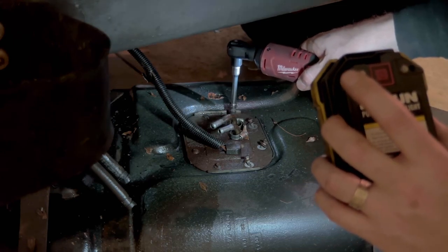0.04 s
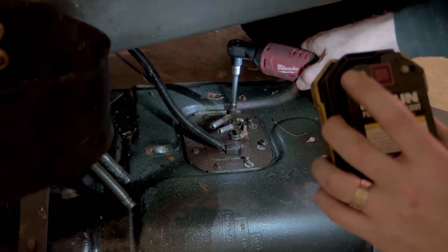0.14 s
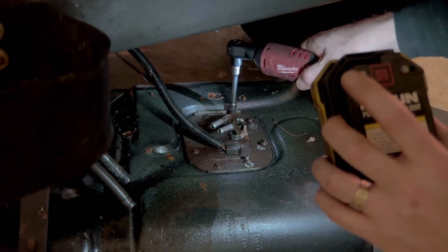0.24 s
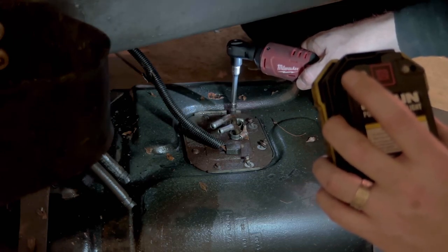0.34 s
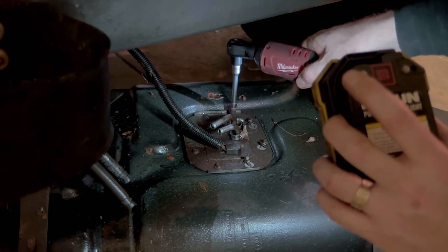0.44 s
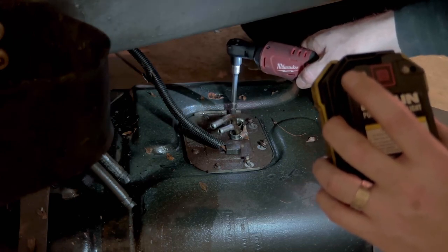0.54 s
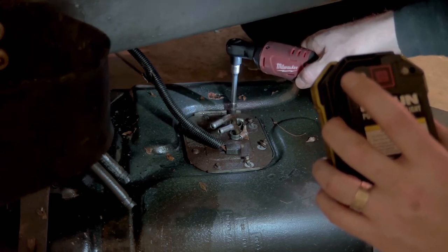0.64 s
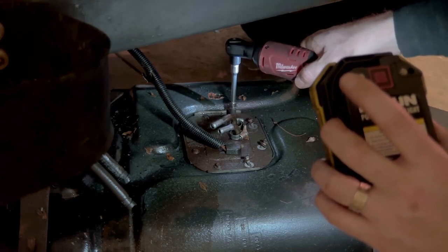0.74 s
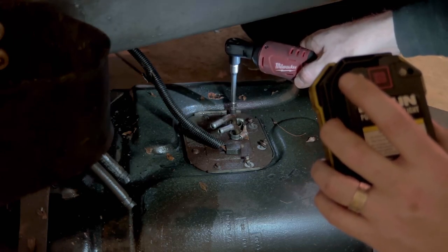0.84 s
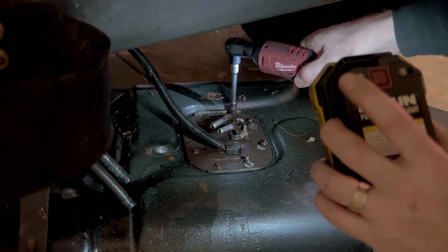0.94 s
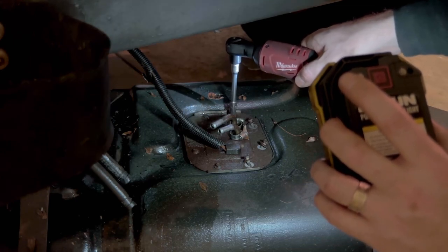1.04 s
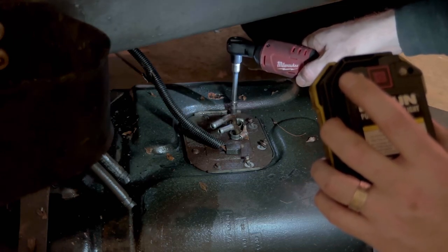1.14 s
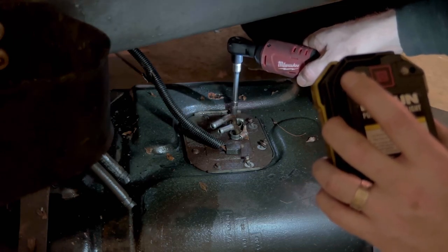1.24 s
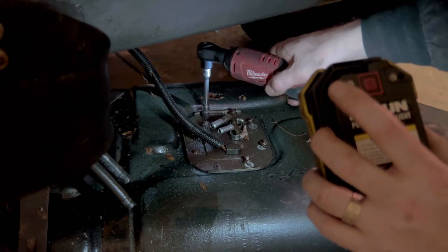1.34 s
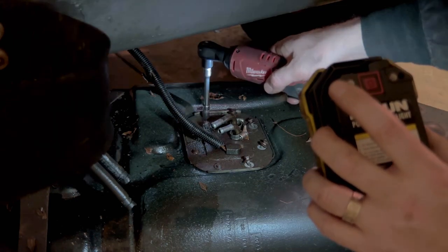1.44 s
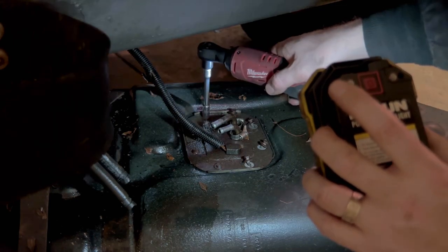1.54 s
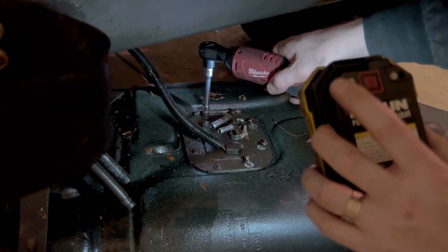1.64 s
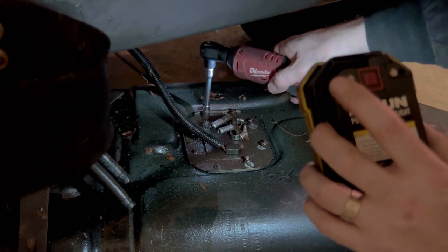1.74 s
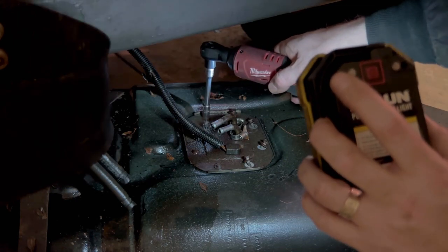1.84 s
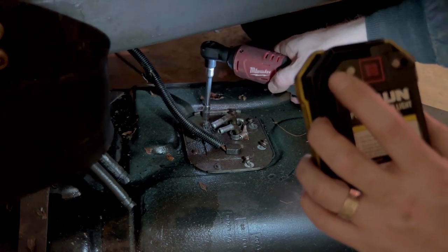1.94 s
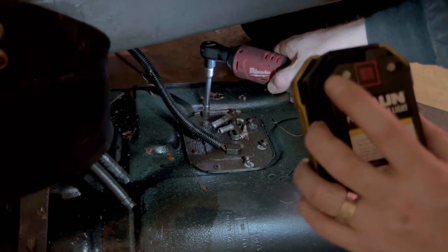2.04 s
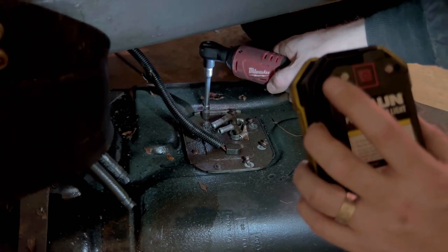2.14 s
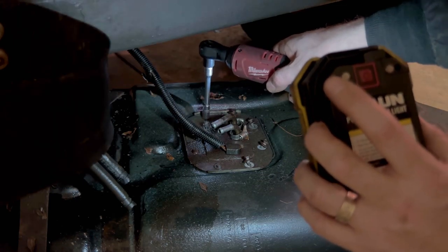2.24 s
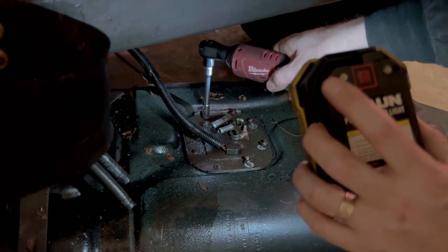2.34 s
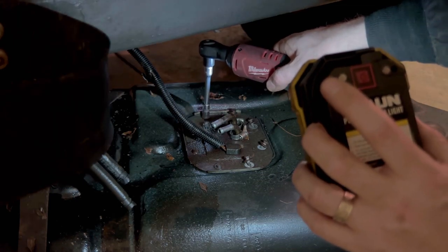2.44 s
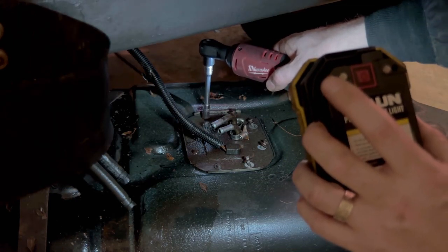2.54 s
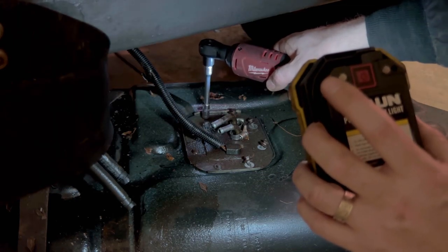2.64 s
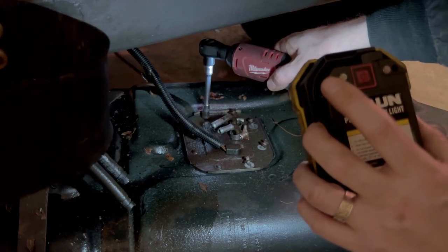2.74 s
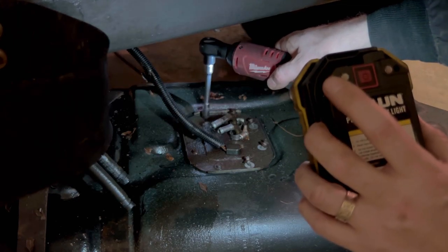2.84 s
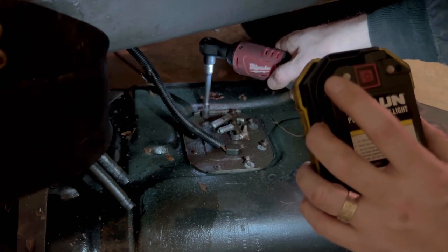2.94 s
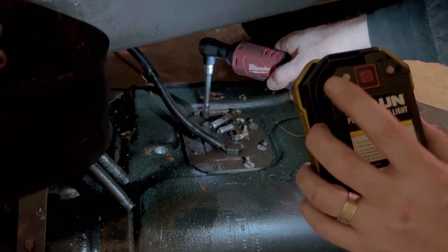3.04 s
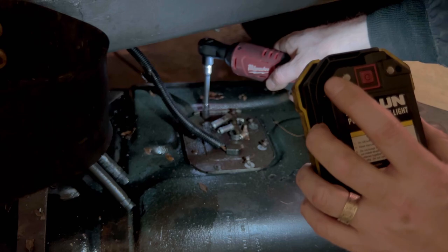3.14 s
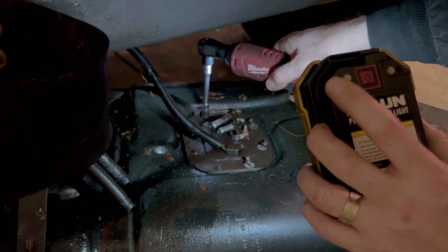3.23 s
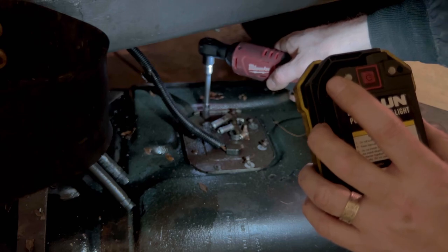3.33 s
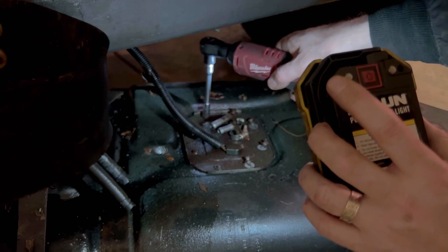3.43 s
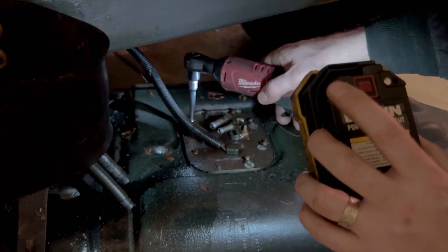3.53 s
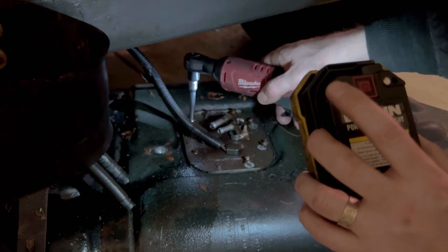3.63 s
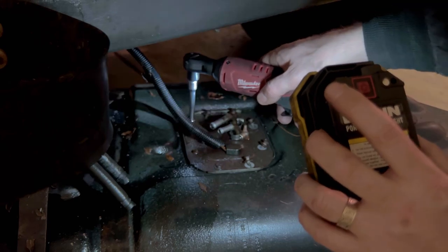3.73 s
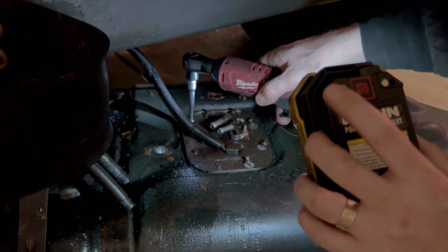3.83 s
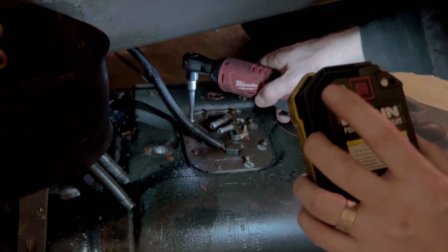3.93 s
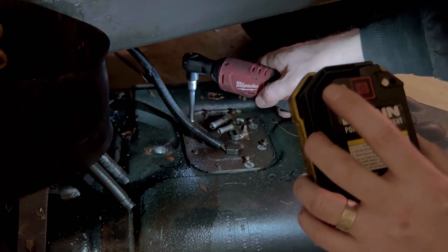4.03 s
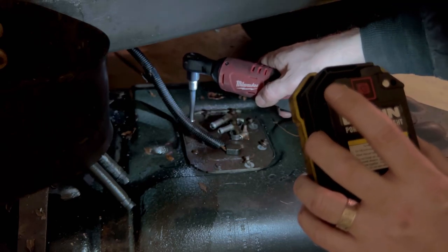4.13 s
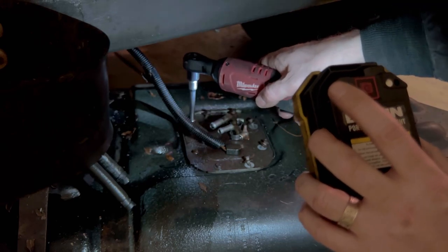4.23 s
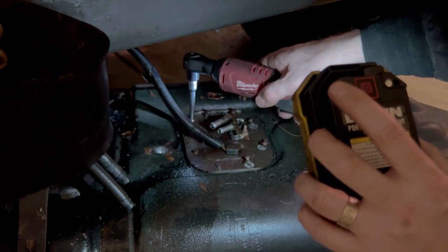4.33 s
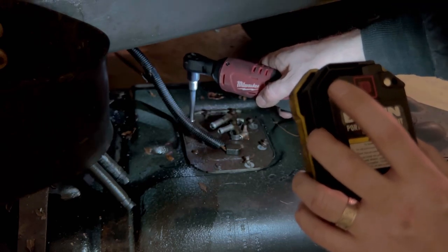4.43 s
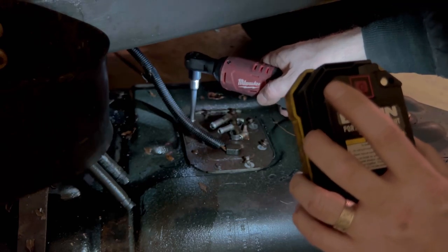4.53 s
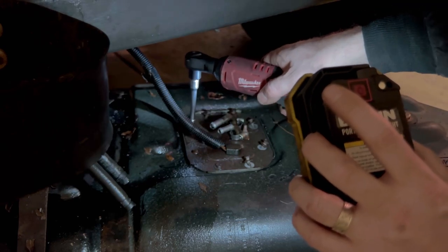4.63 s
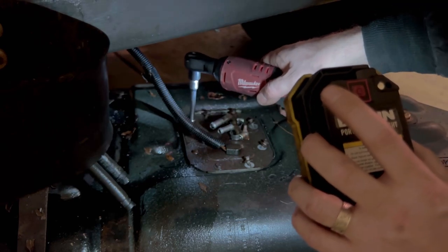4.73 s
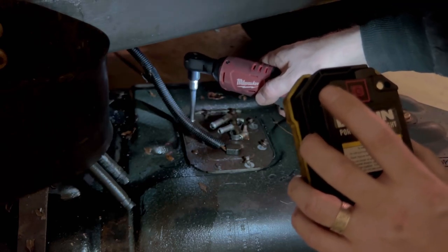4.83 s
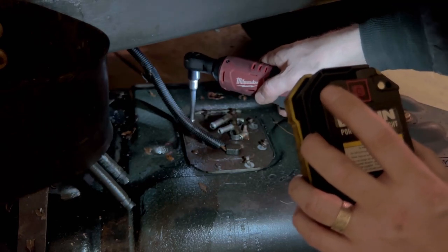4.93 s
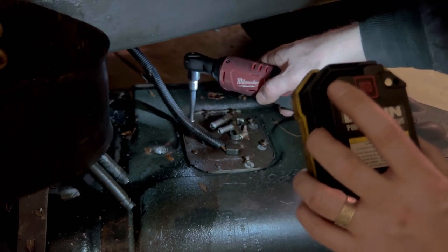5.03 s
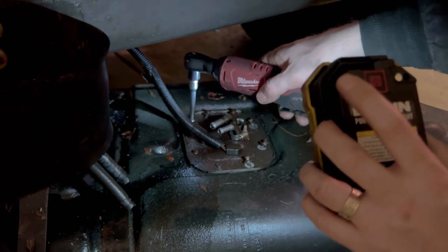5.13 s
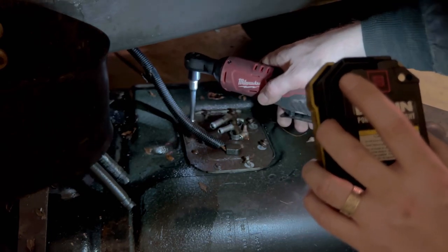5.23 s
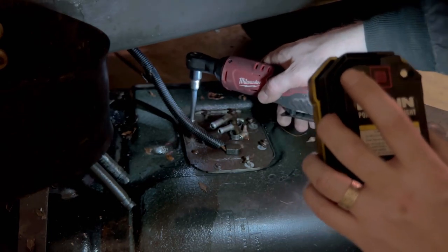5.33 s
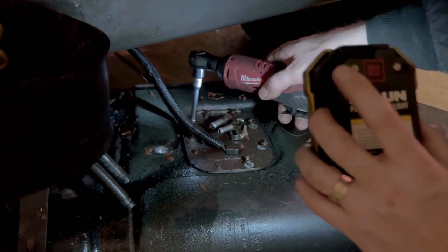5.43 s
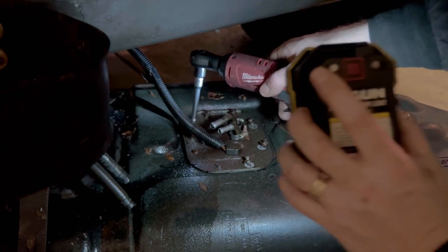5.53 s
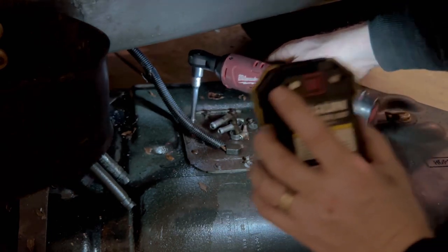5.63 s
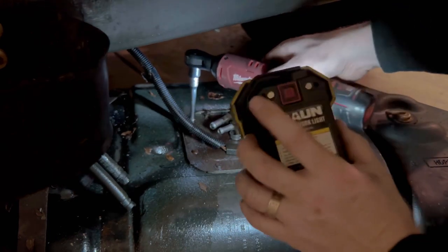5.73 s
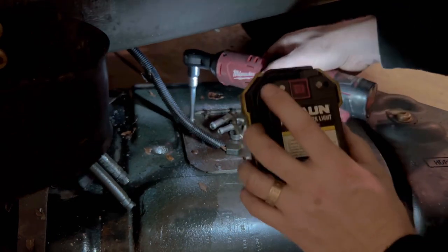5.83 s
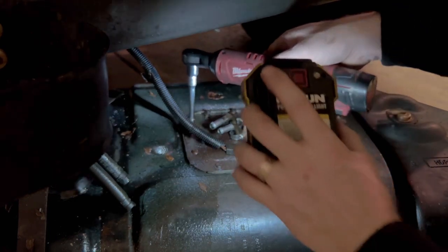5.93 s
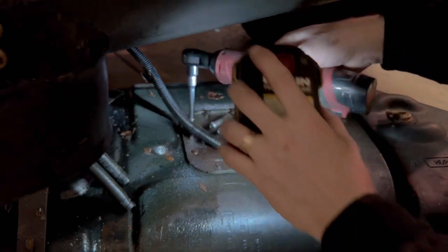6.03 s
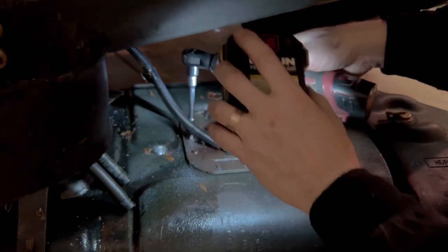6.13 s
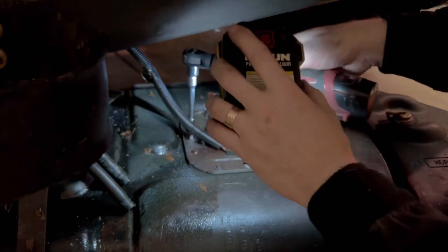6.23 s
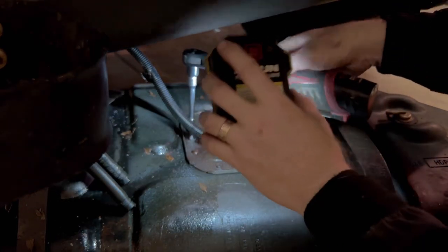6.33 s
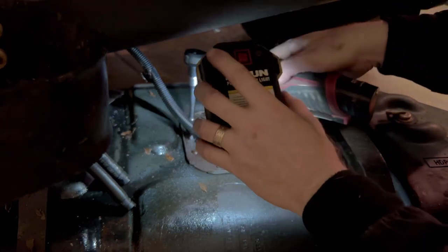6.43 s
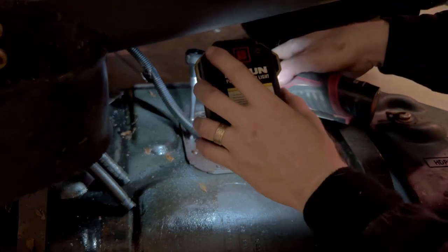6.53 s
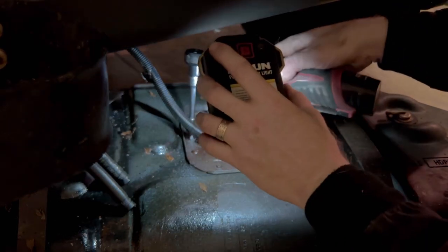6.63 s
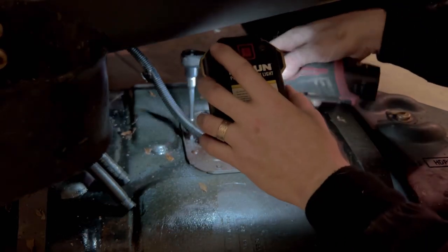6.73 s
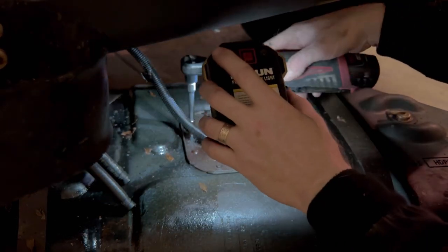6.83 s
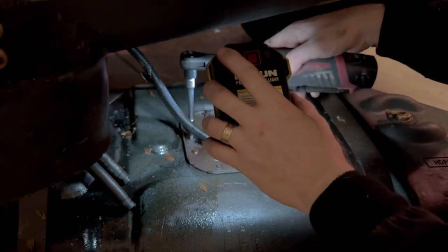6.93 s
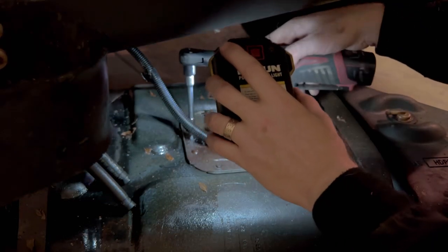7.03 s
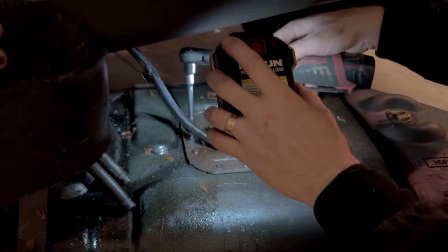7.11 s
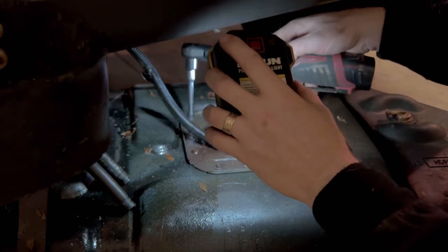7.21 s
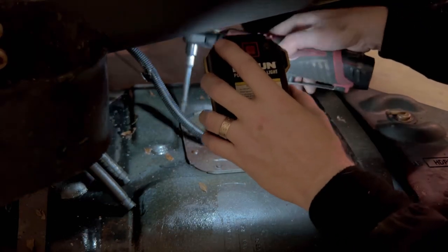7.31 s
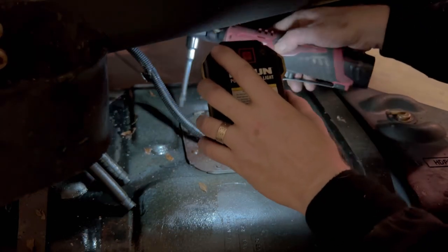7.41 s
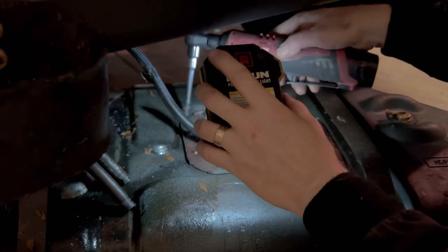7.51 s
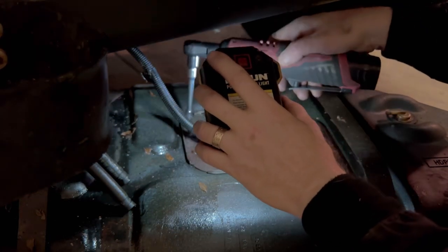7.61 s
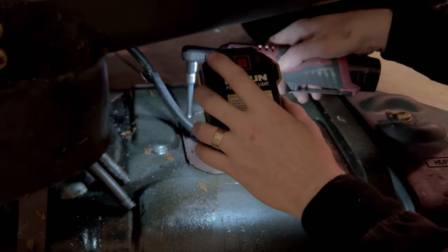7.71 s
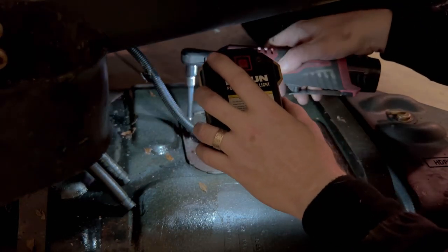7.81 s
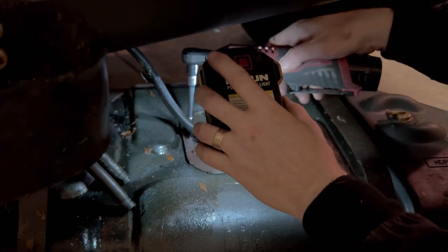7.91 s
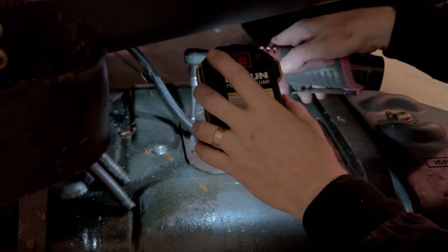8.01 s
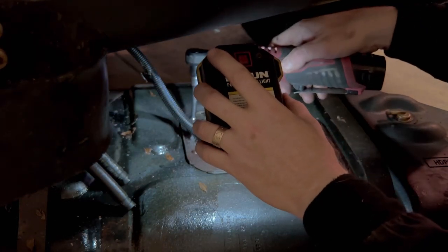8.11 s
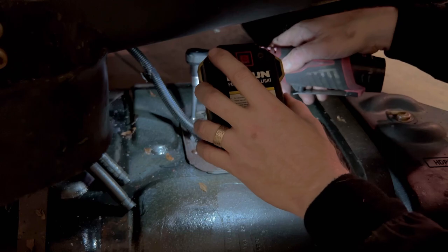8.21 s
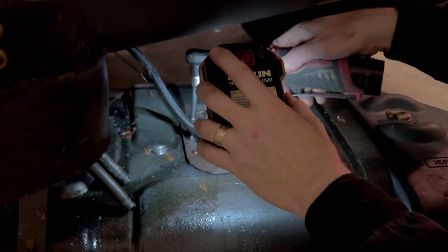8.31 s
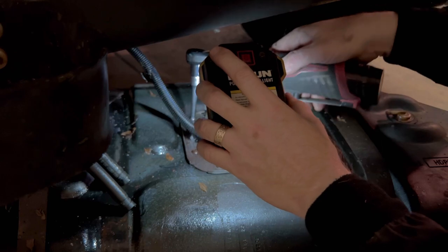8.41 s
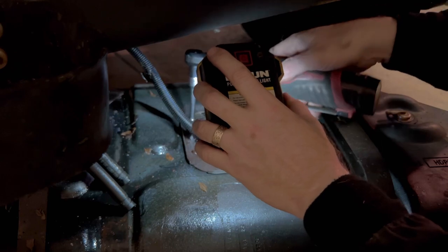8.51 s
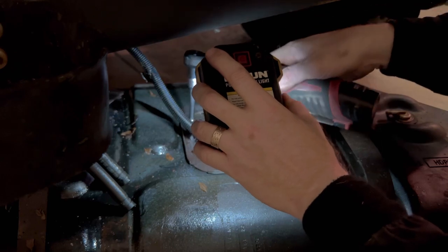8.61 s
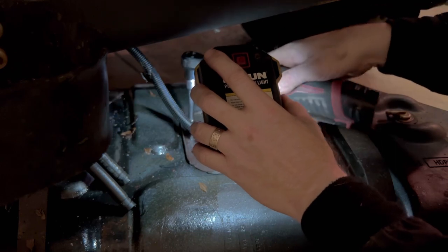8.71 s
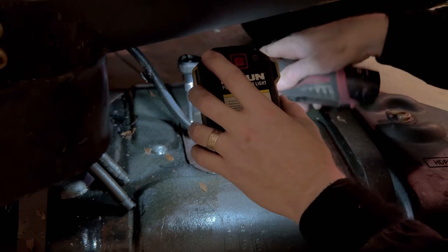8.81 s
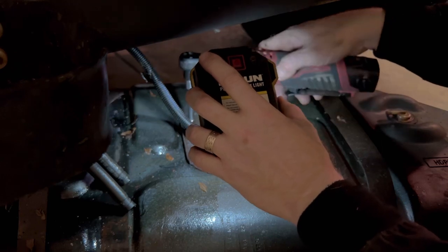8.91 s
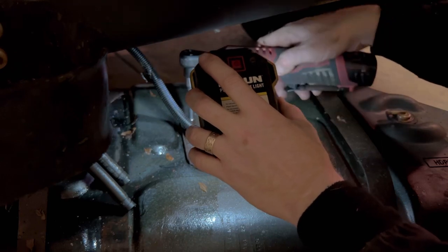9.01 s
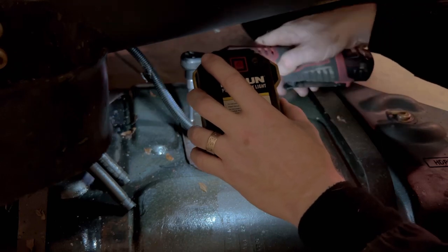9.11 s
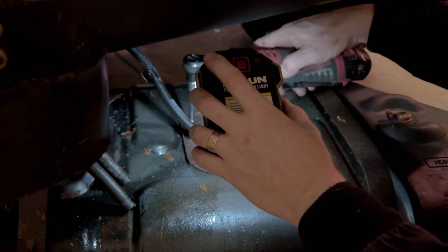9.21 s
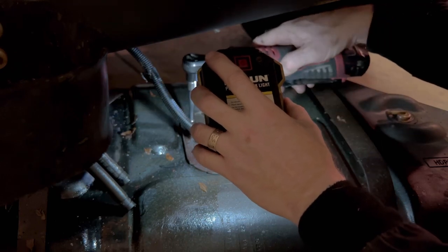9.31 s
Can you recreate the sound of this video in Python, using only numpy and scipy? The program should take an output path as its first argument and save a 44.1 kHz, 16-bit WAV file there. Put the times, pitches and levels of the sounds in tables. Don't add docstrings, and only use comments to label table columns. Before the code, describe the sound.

Close to a small camera microphone in a garage, a cordless ratchet is already running, a harsh metallic buzz with bright pawl ringing. A sharp knock leads straight into a second run pressing on the steel tank. It stops abruptly, two light ticks follow, then a last, more strained run coasts down into single clicks. Afterwards only bit and tool knocks, faint taps and low hum remain.

```python
import sys
import numpy as np
from scipy import signal
from scipy.fft import rfft, irfft, next_fast_len
from scipy.io import wavfile
from scipy.ndimage import uniform_filter1d, map_coordinates

SR = 44100
rng = np.random.default_rng(int(sys.argv[2]) if len(sys.argv) > 2 else 0)


def store_wav(level_fs):
    pcm = np.round(np.clip(np.atleast_2d(level_fs), -1, 1) * 32767)
    wavfile.write(sys.argv[1], SR, pcm.T.astype(np.int16))


def rack_gain(trim_db):
    fader = np.asarray(trim_db, float)
    return 10 ** (fader / 20)


N = 412762
FULL = 73.5


def unit(x):
    return x / np.sqrt(np.mean(x ** 2) + 1e-20)


def along(points, hz):
    f, v = np.transpose(points)
    return np.interp(np.log(hz + 1), np.log(f + 1), v)


def curves(rows, off=None):
    s, *cols = np.transpose(rows)
    t = np.arange(N) / SR
    return np.array([np.interp(t, s, c, off, off) for c in cols])


def wobble(rate):
    knots = rng.standard_normal(int(N * rate / SR) + 4)
    return map_coordinates(knots, [np.arange(N) * rate / SR])


def filtered(x, response):
    m = next_fast_len(len(x) + 8192)
    return irfft(rfft(x, m) * response(np.fft.rfftfreq(m, 1 / SR)), m)[:len(x)]


def coloured(x, spectrum):
    return unit(filtered(x, lambda hz: rack_gain(along(spectrum, hz))))


def band(x, low_hz, top_hz):
    return signal.sosfilt(signal.butter(4, [low_hz, top_hz], "band", fs=SR, output="sos"), x)


def decays(impulses, t60):
    return signal.lfilter([1], [1, -rack_gain(-60 / (t60 * SR))], impulses)


def strikes(angle, pattern, jitter_s, scatter_db):
    out = np.zeros(N)
    for place, db in pattern:
        at = np.flatnonzero(np.diff(np.floor(angle - place)) == 1)
        luck = rng.standard_normal((N // 300, 2))[:len(at)]
        at = np.clip(at + (jitter_s * SR * luck[:, 0]).astype(int), 0, N - 1)
        out[at] += rack_gain(db + scatter_db * (luck[:, 1] + 0.54 * wobble(2.3)[at]))
    return out


def orders(angle, multiples, levels_db, flicker_db, drift):
    out = np.zeros(N)
    for multiple, db in zip(multiples, levels_db):
        level = rack_gain(db + flicker_db * wobble(16))
        out += level * np.sin(2 * np.pi * multiple * angle + drift * wobble(22))
    return out


def garage(push_db):
    # time in seconds,
    # level in dB.
    background_curve = [(0, -5), (3.0, -1), (3.6, 2.5), (5.7, 1), (5.95, -0.5), (6.4, 0), (7.45, -1.5), (8.3, 4.5),
                        (9.36, 6.5)]
    # frequency in Hz, level in dB per Hz.
    hum_spectrum = [(15, -54.5), (25, -19), (50, -5.5), (65, 1.5), (140, -11), (162, -15.5), (194, -22),
                    (300, -18), (390, -46.5), (660, -120)]
    # frequency in Hz, level in dB per Hz.
    air_spectrum = [(120, -42), (200, -16.5), (320, -7.5), (700, -14.5), (1400, -20), (2500, -22.5),
                    (4300, -26), (4800, -31.5), (8400, -33.5), (9300, -39.5), (12500, -37.5), (14500, -40),
                    (15800, -57)]
    # time in seconds, rustle in dB.
    sleeve = [(5.72, -36), (5.73, -41), (5.822, -61.5), (5.93, -52), (6.056, -60), (6.338, -63.5),
              (6.5, -78)]
    # frequency in Hz, level in dB per Hz.
    cloth_spectrum = [(710, -41), (1200, -7), (2000, -2), (5180, -6.5), (6230, -6), (9720, -18),
                      (11600, -13), (16000, -38)]
    background_db, = curves(background_curve)
    hum_level = (rack_gain(-47 + background_db) + rack_gain(push_db - 14)) * rack_gain(2.0 * wobble(8.3))
    hum = hum_level * coloured(rng.standard_normal(N), hum_spectrum)
    air = rack_gain(-57.5 + 0.52 * background_db) * coloured(rng.standard_normal(N), air_spectrum)
    cloth = coloured(rng.standard_normal(N) * rack_gain(0.95 * wobble(220)), cloth_spectrum)
    return hum + air + rack_gain(curves(sleeve, off=-200)[0] + 4.0) * cloth


def panel_tones():
    # start in seconds, level in dB, pitch in Hz, t60 in seconds.
    panels = [(1.362, -17, 126, 0.27), (1.364, -24.5, 608, .12), (5.703, -21, 198, 0.078),
              (5.709, -30.5, 85.5, 0.43), (5.702, -20, 1520, 0.064), (6.725, -41, 524, 0.095),
              (6.717, -38, 3704, .23), (6.717, -38, 1880, .15), (7.821, -37, 855, 0.064),
              (7.998, -40, 1120, 0.083), (8.158, -42.5, 620, .06), (8.301, -34, 110, .15),
              (8.335, -35, 228, 0.11)]
    out, t = np.zeros(N + SR), np.arange(SR // 2) / SR
    wander = .6 * wobble(60)
    rise = 1 - np.exp(-t / 0.0017)
    for s, db, hz, t60 in panels:
        at = round(s * SR)
        phase = 2 * np.pi * hz * t + wander[at:at + len(t)]
        out[at:at + len(t)] += rack_gain(db - 60 * t / t60) * rise * np.sin(phase)
    return out[:N]


def garage_answer(length):
    # frequency in Hz, t60 in seconds.
    room = [(200, 0.66), (2000, 0.33), (6000, 0.3), (14000, 0.063)]
    hz, u, z = signal.stft(rng.standard_normal(length), SR, nperseg=256)
    z = z * rack_gain(-60 * u / along(room, hz)[:, None])
    echo = signal.istft(z, SR, nperseg=256)[1][:length]
    knots = rng.standard_normal(200)
    return filtered(echo, lambda f: rack_gain(3 * np.interp(f / 130, np.arange(len(knots)), knots) - 2))


def ticks():
    # start in seconds, peak in dB,
    # then thud, body and edge in dB relative to the crack.
    knocks = [(1.3513, -9.5, -12, -7, -13.5), (3.9273, -31.5, -25, -14, -10),
              (4.0266, -27.5, -22, -11, -13), (5.5222, -22, -13, -8, -8), (5.7016, -18.5, -17.5, -9, -15),
              (6.716, -14.5, -21, -12.5, -10.5), (7.8199, -51, 10, 7, -20), (7.989, -33, -8, -2, -25),
              (8.2945, -17.5, -14.5, -12.5, -19), (8.7626, -37.5, -11, -7, -14),
              (8.8164, -35.5, -3, -6, -21), (8.9531, -37, -1, -2.5, -17)]
    # start in seconds, peak in dB, dullness in dB.
    faint_taps = [(6.1923, -50, -9), (6.859, -45, -4), (7.187, -51, 3), (7.236, -47, -6.5),
                  (7.2539, -47, -12), (7.8692, -54.5, 3), (8.159, -57.5, 14), (8.492, -48, -1),
                  (8.6711, -55, 0), (8.891, -49, -3), (8.9322, -45, -3), (9.165, -46.5, -8),
                  (9.1894, -46.5, -4), (9.239, -51, -5), (9.3372, -46, -8)]
    # start in seconds, level in dB, thud, body and edge in dB.
    scrapes = [
        (5.687, -34.5, -18, -16, -10),
        (5.705, -49, 14, 8, -11.5),
        (8.266, -48, 0, -6, -21),
    ]
    # pitch in Hz, level in dB, t60 in seconds.
    steel = [(3280, 11, 0.19), (3720, 4.5, 0.26), (4340, -17.5, 0.16), (4904, -15, 0.086), (7680, -2, 0.14)]
    taps = [(s, db, dull, -1 + .45 * dull, -14.5) for s, db, dull in faint_taps]
    contacts = [(*row, 0.032) for row in list(knocks) + taps]
    contacts += [(*row, 0.26) for row in scrapes]
    out, t = np.zeros(N + SR), np.arange(SR // 2) / SR
    for s, db, thud_db, body_db, edge_db, t60 in contacts:
        hard = db > -28
        rise = .0002 if hard else .0012
        fall = rack_gain(-60 * t / np.clip(t60, .004, .4))
        crack = rng.standard_normal(len(t)) * fall * (1 - np.exp(-t / rise))
        crack[3] += 4 * hard
        build_up = 1 - np.exp(-t / 0.0023)
        both = crack + rack_gain(-11.5) * garage_answer(len(t)) * build_up
        hit = rack_gain(thud_db + 20.5) * band(both, 130, 690)
        hit += rack_gain(body_db + 13.5) * band(both, 800, 2200)
        hit += rack_gain(2.0) * band(both, 2400, 4600)
        hit += rack_gain(edge_db + 10.0) * band(both, 4500, 8700)
        hit += rack_gain(2 * edge_db + 11.5) * band(both, 10000, 16000)
        ring = np.zeros(len(t))
        for hz, gain_db, ring_t60 in steel:
            level = rack_gain(gain_db - 24.5 + rng.normal(0, 1.4) - 60 * t / (0.44 * ring_t60))
            ring += level * np.sin(2 * np.pi * hz * t)
        out[round(s * SR):][:len(t)] += rack_gain(db) * (hit + hard * ring)
    return out[:N]


def switch_whine():
    # pitch in Hz, level in dB rms.
    partials = [(1868, -45), (3736, -62), (5604, -41), (7472, -56), (9340, -66), (13076, -66)]
    t = np.arange(N) / SR
    swell = curves([(4.002, -25), (4.014, 3), (4.024, -6), (4.028, -6), (4.04, 4), (4.055, -3),
                    (4.07, -30)], off=-200)[0]
    tone = sum(rack_gain(db + 6) * np.sin(2 * np.pi * hz * t) for hz, db in partials)
    return rack_gain(swell) * tone


def short_tail():
    tail = curves([(3.563, -23), (3.575, -54), (3.579, -75.5)], off=-200)[0]
    return rack_gain(tail) * unit(band(rng.standard_normal(N), 2500, 15000))


def loose_screw(angle):
    start_s, end_s, ping_hz, width_hz = 4.75, 5.32, 2410, 310
    ping = lambda f: 1j * f * width_hz / (ping_hz ** 2 - f * f + 1j * f * width_hz)
    share = np.clip((np.arange(N) / SR - start_s) / (end_s - start_s), 0, 1)
    swell = np.sqrt(np.abs(np.sin(np.pi * share)))
    hits = strikes(angle, [(.62, 0)], jitter_s=.0012, scatter_db=5.5)
    return rack_gain(-25.5) * swell * unit(filtered(hits, ping) + .25 * band(hits, 2800, 6200))


def crank():
    bursts = [
        (0, 0, .5573, 1.349, 1.349),
        (1.349, 1.349, 2.2905, 3.5635, 3.5635),
        (4.027, 4.124, 4.8182, 5.28, 5.687),
    ]
    # turns per second at the pawl drop, creep in turns per second per second,
    # lag at the start in turns per second, catch-up in seconds.
    pace = [
        (73.53, -.083, 0, .1),
        (73.45, 0, 3.9, .09),
        (73.07, .65, 97, .042),
    ]
    # time in seconds, effort in dB, pressure on the tank in dB,
    # grip of the thread in dB.
    hand = [
        [(0, -17, -22.5, -39), (.05, -18, -19, -45), (.6, -18.5, -25, -51), (.78, -19.5, -21.5, -46),
         (.9, -19, -30, -52), (1.15, -19.5, -29.5, -50), (1.25, -20.5, -27, -64), (1.34, -19.5, -30, -50)],
        [(1.35, -21.5, -19, -45), (1.38, -17.5, -4, -40), (1.42, -17, -4, -33), (1.5, -15.5, -13.5, -34),
         (1.7, -16, -18.5, -35), (1.92, -17.5, -18, -35.5), (2.03, -17.5, -20, -43.5), (3.0, -18.5, -22, -53),
         (3.56, -19, -29.5, -55)],
        [(4.03, -12, -17.5, -35), (4.14, -14.5, -6.5, -34), (4.35, -15, -11, -35), (4.7, -16.5, -17.5, -41.5),
         (4.9, -18, -11, -38), (5.1, -18, -9.5, -35.5), (5.25, -17, -11, -43), (5.68, -15, -14.5, -41)],
    ]
    fades_db = (29.2, 23, 19, 9.7, 55)
    release_s, drag_s, friction = 5.17, .5625, 42
    t = np.arange(N) / SR
    angle, speed = np.zeros(N), np.ones(N)
    fast, level = np.zeros(N, bool), np.full((5, N), -200.)
    for (start, first, drop, last, end), (cruise, creep, lag, catch), rows in zip(bursts, pace, hand):
        since = np.clip(t - start, 0, None)
        inside = (t >= start) & (t < end)
        rate = cruise + creep * (np.minimum(t, release_s) - drop) - lag * np.exp(-since / catch)
        coast = np.exp(-np.clip(t - release_s, 0, None) / drag_s)
        rate = np.clip((rate + friction) * coast - friction, 2, None)
        turns = np.cumsum(rate) / SR
        angle[t >= start] = (turns - turns[round(drop * SR)])[t >= start]
        speed[inside] = rate[inside]
        fast |= (t >= first) & (t < last)
        effort, pressure, grip = curves(rows)
        slip = 10 * (lag > 0) * np.exp(-since / 0.1)
        pawl_db = effort - 2.5 + 1.2 * wobble(14) - slip
        shaft_db = effort - 3 + 0.35 * pressure
        tank_db = effort + pressure - 2.5 + 0.41 * wobble(6)
        push_db = grip + .8 * wobble(8.5)
        full = np.array([effort, pawl_db, shaft_db, tank_db, push_db])
        level = np.where(inside, full + np.outer(fades_db, np.log10(rate / FULL)), level)
    return angle, speed, fast, level


def pawl_ring(impulses):
    # pitch in Hz, width in Hz, level in dB.
    modes = [(11700, 160, -4), (12020, 150, -2), (12450, 130, 0), (12900, 260, -7), (5800, 700, -20)]

    def response(f):
        total = 0
        for k, (hz, width, db) in enumerate(modes):
            total = total + (-1) ** k * rack_gain(db) * 1j * f * width / (hz * hz - f * f + 1j * f * width)
        return total
    return filtered(impulses, response)


def fast_pawl(angle, speed, fast, on):
    # share of the turn, level in dB.
    teeth = [(0, 0), (.135, -2), (.38, -7), (.5, -9)]
    # frequency in Hz, level in dB per Hz.
    hiss_spectrum = [(5590, -41), (9500, -10), (10400, -6), (12100, 3.5), (12600, -4), (13700, -5),
                     (15000, -2), (15700, -20)]
    drops = unit(pawl_ring(fast * strikes(angle, teeth, jitter_s=.0001, scatter_db=2.4)))
    grains = on * rng.standard_normal(N) * rack_gain(2.8 * wobble(500))
    hiss_db = -7 * (1 - speed / FULL)
    return 0.55 * drops + 0.71 * rack_gain(hiss_db) * coloured(grains, hiss_spectrum)


def slow_pawl():
    # start in seconds, peak in dB.
    single_drops = [(4.0477, -4), (4.0558, -12), (4.0966, 2), (4.1135, 0), (5.2913, -4), (5.314, -14),
                    (5.3384, -10), (5.3512, -12), (5.3638, -7), (5.3887, -16), (5.3929, -11), (5.4226, -11),
                    (5.4509, -26), (5.4504, -11), (5.496, -9.5), (5.5054, -14), (5.5535, -6), (5.567, -13)]
    impulses = np.zeros(N)
    for s, db in single_drops:
        impulses[round(s * SR)] = rack_gain(db + 25.0)
    return pawl_ring(impulses) + .03 * band(impulses, 4500, 15500)


def shaken_parts(angle, on):
    # share of the turn, level in dB.
    slams = [(.4, -3.5), (0.62, -6.5), (0.23, -22)]
    # frequency in Hz, level in dB per Hz.
    housing_spectrum = [(940, -28), (1600, -10.5), (3030, -2.5), (3330, 0), (4050, 0), (4850, -6.5),
                        (5460, -2), (5590, -1), (5960, -0.5), (6860, -6.5), (8030, -7.5), (8970, -17),
                        (10500, -16.5), (13600, -46), (22000, -120)]
    # frequency in Hz, level in dB per Hz.
    shaft_spectrum = [(280, -42), (480, -4.5), (513, -9), (681, -2.5), (868, 2.5), (1020, -2), (1270, 0.5),
                      (1370, -1.5), (2400, 0.5), (3120, -17), (5280, -120)]
    # frequency in Hz, level in dB per Hz.
    tank_spectrum = [(59, -34.5), (100, -1), (187, -0.5), (216, -4), (383, 0), (430, -4.5), (583, -4),
                     (620, -3.5), (810, -38.5), (1360, -120)]
    noise = lambda: on * rng.standard_normal(N)
    blows = on * strikes(angle, slams, jitter_s=0.00044, scatter_db=2.5)
    slam = decays(blows, t60=0.035)
    rattle = rack_gain(1.1 * wobble(400))
    housing = coloured(noise() * rattle * (1 + 1.1 * slam), housing_spectrum)
    housing = unit(housing + .17 * coloured(blows, housing_spectrum))
    shaft = coloured(noise() * (1 + 2.4 * slam), shaft_spectrum)
    tank = coloured(noise() * (1 + 3.1 * slam), tank_spectrum)
    return housing, shaft, tank


def crank_tones(angle, house_db, shaft_db, tank_db):
    # multiples of the crank speed, then their levels in dB.
    gear_orders = [4.39, 79, 105.36, 158]
    gear_db = [-26.5, -12.5, -26, -30]
    # multiples of the crank speed, then their levels in dB.
    yoke_orders = [5, 7, 8, 10, 11, 12, 17.5, 23]
    yoke_db = [-16, -15, -16.5, -16, -11.5, -11.5, -11, -10.5]
    # multiples of the crank speed, then their levels in dB.
    wall_orders = [1.54, 2, 2.57, 3.58, 5.3, 6.3]
    wall_db = [-10, -10, -6, -8, -14, -12]
    gears = rack_gain(house_db + 3) * orders(angle, gear_orders, gear_db, flicker_db=2.8, drift=.8)
    yoke = rack_gain(shaft_db - 3.5) * orders(angle, yoke_orders, yoke_db, flicker_db=6.0, drift=0.13)
    pressed_db = np.where(np.arange(N) > 3.8 * SR, 3, -5)
    wall = rack_gain(tank_db + pressed_db) * orders(angle, wall_orders, wall_db, flicker_db=2.5, drift=.3)
    return gears + yoke + wall


def ratchet(angle, speed, fast, level):
    on = level[0] > -150
    house_db, pawl_db, shaft_db, tank_db, push_db = level
    housing, shaft, tank = shaken_parts(angle, on)
    noisy = rack_gain(house_db) * housing + rack_gain(shaft_db) * shaft + rack_gain(tank_db) * tank
    noisy += rack_gain(pawl_db) * fast_pawl(angle, speed, fast, on)
    noisy *= np.sqrt(on.mean())
    steady = np.clip(speed - 72, 0, 1)
    tones = steady * crank_tones(angle, house_db, shaft_db, tank_db)
    drum = rack_gain(push_db + 4.0) * np.sin(2 * np.pi * angle)
    return on * (noisy + tones + drum) + slow_pawl()


def scene():
    angle, speed, fast, level = crank()
    background = garage(level[-1])
    contacts = ticks() + panel_tones()
    tool = ratchet(angle, speed, fast, level) + loose_screw(angle) + switch_whine() + short_tail()
    return (background + contacts + tool)[None]


def treble_dropouts(x, rare):
    hz, t, z = signal.stft(x, SR, nperseg=1024)
    field = uniform_filter1d(rng.standard_normal(z.shape), size=9, axis=0)
    field = unit(uniform_filter1d(field, size=6, axis=1))
    z = z * np.where((field > rare) & (hz[:, None] > 13300), .03, 1)
    return signal.istft(z, SR, nperseg=1024)[1][:N]


def top_cut(x):
    return signal.sosfilt(signal.butter(12, 16670, fs=SR, output="sos"), x)


def record(dry):
    soft = dry[0] / (1 + np.abs(dry[0] / .95) ** 4) ** (1 / 4)
    patchy = treble_dropouts(soft, rare=1.15)
    limited = filtered(patchy, lambda hz: np.clip((15880 - hz) / 60, .01, 1))
    return top_cut(limited[None])


dry = scene()
out = record(dry)
store_wav(out)
```